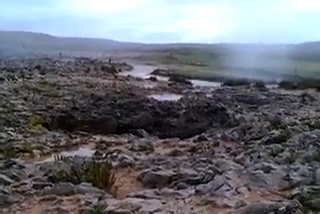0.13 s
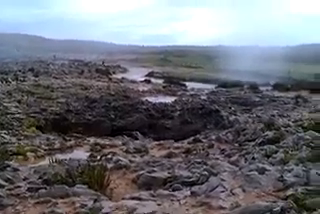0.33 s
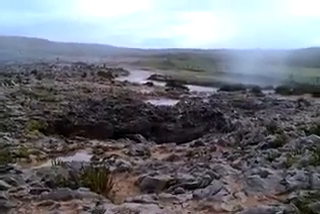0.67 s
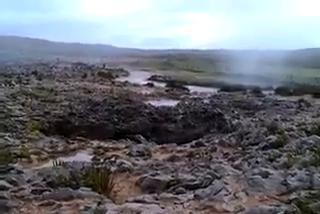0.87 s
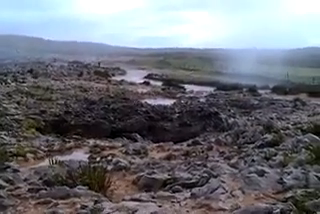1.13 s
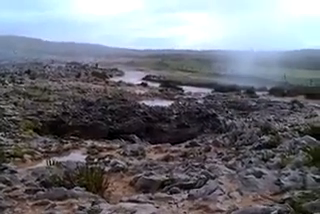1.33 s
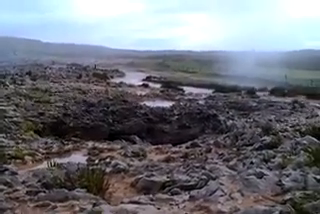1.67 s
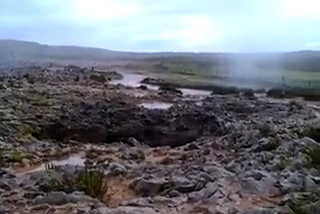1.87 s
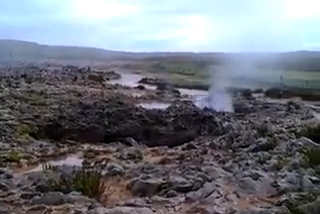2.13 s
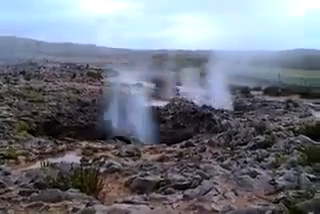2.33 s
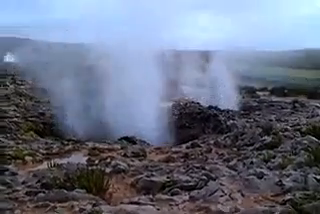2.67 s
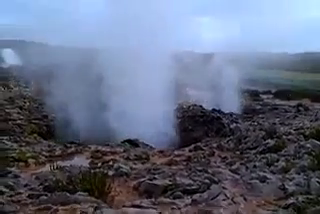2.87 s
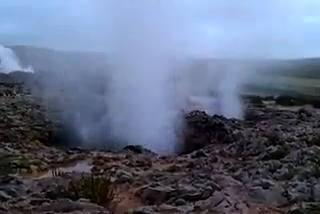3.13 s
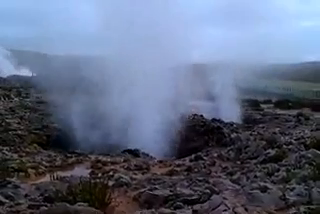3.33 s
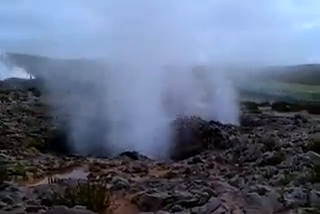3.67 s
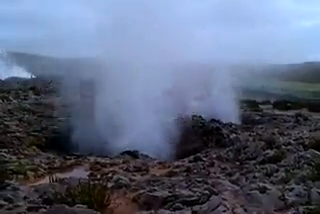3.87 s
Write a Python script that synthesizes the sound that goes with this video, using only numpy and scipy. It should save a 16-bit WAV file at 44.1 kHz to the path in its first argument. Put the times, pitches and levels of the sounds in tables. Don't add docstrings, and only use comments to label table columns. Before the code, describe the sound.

A blowhole erupts on a rocky coast: faint surf and fizzing spray, dull water slaps in a cave, then a deep roar and broad hissing jet that gradually eases. Outdoor single microphone, slightly coarse treble.

```python
import sys
import numpy as np
from scipy import signal
from scipy.fft import rfft, irfft
from scipy.io import wavfile
from scipy.ndimage import uniform_filter1d

SR = 44100
rng = np.random.default_rng(int(sys.argv[2]) if len(sys.argv) > 2 else 0)


def dump(signal):
    limited = np.clip(np.atleast_2d(signal).T, -1, 1)
    pcm = np.round(limited * 32767).astype(np.int16)
    wavfile.write(sys.argv[1], SR, pcm)


def level_to_linear(level):
    exponent = np.asarray(level, float) / 20
    return 10 ** exponent


N = 176400

# time_s, wash_db, fizz_db
SHORE_LEVELS = [(0, -44.5, -49), (.3, -43.5, -50.5), (.65, -43, -48.5), (.9, -43.5, -45), (1.1, -41, -46),
                (1.3, -41, -46.5), (1.5, -42.5, -49.5), (1.95, -41, -45), (2.2, -40, -45),
                (3.0, -40, -48.5), (3.6, -42.5, -48), (4, -46.5, -45)]
# time_s, peak_db, length_s
NEAR_SPLASHES = [
    (0.111, -46, .02),
    (.249, -38, 0.013),
]
# time_s, roar_db
CAVE_PRESSURE = [(0, -42.5), (.58, -41.5), (.75, -36.5), (.86, -43), (1.0, -37), (1.2, -38.5),
                 (1.38, -32.5), (1.5, -41), (1.85, -34.5), (2.05, -32), (2.19, -27.5), (2.27, -28.5),
                 (2.38, -22.5), (2.7, -20.5), (3.2, -23), (3.55, -26), (3.8, -27), (4.0, -29)]
# time_s, peak_db, width_ms
ROOF_SLAPS = [(0.726, -19.5, 1.7), (.795, -26.5, 1.5), (1.13, -28, 1.8), (1.318, -29, 0.76),
              (1.599, -28, 2.0), (1.999, -25.5, 1.8), (2.064, -24, 4.3), (2.13, -31, 2.5),
              (2.196, -18.5, 2.5), (2.376, -16, 1.15), (3.547, -19, 1.06)]
# time_s, hiss_db
BLOWHOLE_FLOW = [(0, -69), (1.9, -69), (2.2, -45), (2.36, -34.5), (2.52, -28.5), (2.65, -27.5),
                 (2.8, -27.5), (3.0, -28.5), (3.15, -29), (3.3, -31.5), (3.45, -29.5), (3.6, -34),
                 (3.7, -36), (3.83, -38.5), (3.92, -40), (4, -36.5)]
# time_s, level_db
RUSH_FLOW = [
    (2.3, -65),
    (2.45, -44),
    (2.6, -36),
    (2.75, -36.5),
    (2.88, -38),
    (3.0, -42),
    (3.3, -45),
    (4, -68),
]
# time_s, hiss_db
NARROW_FLOW = [
    (2.8, -70),
    (2.95, -49),
    (3.1, -45),
    (3.25, -45),
    (3.45, -40),
    (3.58, -42),
    (3.7, -51),
    (4, -50),
]

# frequency_hz, density_db
WASH_COLOUR = [(190, -17), (330, -5.5), (583, -7), (918, -5), (1260, -6), (1720, -5.5), (4410, -14),
               (5000, -16.5), (6500, -48), (11000, -120)]
SPLASH_COLOUR = [(300, -3), (700, 1), (1400, -4), (2500, -3), (3100, -18)]
FIZZ_COLOUR = [(4600, -9.5), (5100, -4), (5700, 4), (6400, -0.5), (7200, -12.5), (8500, -16), (10500, -23),
               (15000, -73)]
# frequency_hz, density_db
ROAR_LOW_COLOUR = [(12, -42), (20, -11), (48, -5), (133, -2), (219, -11), (249, -9), (330, -17), (420, -26),
                   (550, -24), (920, -120)]
ROAR_HIGH_COLOUR = [(12, -52), (20, -8), (97, 1.5), (157, -2.5), (243, 0.5), (309, -5), (394, -19),
                    (420, -20.5), (550, -31), (920, -120)]
# frequency_hz, density_db
JET_COLOUR = [(300, 0.5), (560, -6.5), (800, -1.5), (1350, -7.5), (2100, -3), (4000, -5.5), (5200, -6.5),
              (7500, -14)]
JET_TOP_COLOUR = [(7000, -12), (8300, -11.5), (10500, -18), (12000, -17), (14000, -46), (16000, -55)]
RUSH_COLOUR = [(550, -6), (780, 3), (1000, -3.5), (1400, -5.5), (2400, -0.5), (3400, -6), (4200, -11)]
# frequency_hz, density_db
NARROW_COLOUR = [(4300, -21), (4800, -10.5), (5200, 1), (5600, -5.5), (6200, -23)]
# frequency_hz, threshold_db
MUTE_UNDER = [(7000, -112), (7800, -99), (8600, -94), (9200, -83.5), (10000, -85), (11500, -88.5),
              (13000, -86), (14000, -84.5), (15000, -86)]

SKIRT_DB = -23
DROPS_PER_S, DROP_SHARE = 3000, 0.34
STEADY_S, STEADINESS = 0.077, 0.54
BRIGHTENS_FROM_DB, BRIGHTENS_OVER_DB = -47.5, 19
JET_TOP_DB = -16
SHAFT_HZ, SHAFT_WIDTH_HZ, SHAFT_DB = 103, 17, -30.5
SHAFT_S, SHAFT_LENGTH_S = 3.77, 0.24
NOTCH_HZ, NOTCH_WIDTH_HZ, NOTCH_DB = 9000, 400, -12
FRAME, BAND_LINES, GRID = 1024, 32, 741
MUTE_FOLLOWS, MUTE_CHANCE_DB = 0.33, 3.5
COARSE_FROM_HZ, COARSE_TO_HZ, WEAK_LINE_DB = 6300, 8600, (-14, -2.5)
TREBLE_LOST_S = (3.80, 3.85)


def in_time(rows):
    time_s, *columns = np.transpose(rows)
    return [np.interp(np.arange(N) / SR, time_s, column) for column in columns]


def rms_one(x):
    return x / np.sqrt(np.mean(x ** 2) + 1e-20)


def noise():
    return rng.standard_normal(N)


def drift(rate_hz):
    r = np.exp(-80 * np.pi * rate_hz / SR)
    chance = rng.standard_normal(N // 40 + 2002)
    slow = signal.lfilter([1], [1, -2 * r, r * r], chance)[2000:]
    return rms_one(slow - slow.mean())


def coloured(x, points, shared_db, patchy_db, rate_hz):
    hz = np.maximum(np.fft.rfftfreq(N, 1 / SR), 1)
    p = np.array(points, float)
    below = [p[0, 0] / 2, p[0, 1] + SKIRT_DB]
    above = [p[-1, 0] * 2, p[-1, 1] + SKIRT_DB]
    p = np.vstack([below, p, above])
    density_db = np.interp(np.log(hz), np.log(p[:, 0]), p[:, 1], left=-150, right=-150)
    spectrum = rfft(x) * level_to_linear(density_db)

    together = drift(rate_hz)
    half_octave = 2 * np.log2(hz)
    at = np.arange(N) / 40
    out = 0
    for k in range(int(2 * np.log2(p[0, 0])), int(2 * np.log2(p[-1, 0])) + 2):
        low, high = np.searchsorted(half_octave, [k - 1, k + 1])
        window = np.cos(np.pi / 2 * (half_octave[low:high] - k)) ** 2
        band = np.zeros_like(spectrum)
        band[low:high] = spectrum[low:high] * window
        gain = level_to_linear(shared_db * together + patchy_db * drift(rate_hz))
        out = out + irfft(band, N) * np.interp(at, np.arange(len(gain)), gain)
    return rms_one(out)


def spray():
    sizes = level_to_linear(3.54 * np.minimum(rng.exponential(1, N), 4))
    impacts = sizes * rng.choice([-1, 1], N)
    drops = rms_one(impacts * (rng.random(N) < DROPS_PER_S / SR))
    return np.sqrt(DROP_SHARE) * drops + np.sqrt(1 - DROP_SHARE) * noise()


def steady(x):
    power = uniform_filter1d(x ** 2, size=int(STEADY_S * SR))
    power = uniform_filter1d(power, size=int(STEADY_S * SR / 2))
    return rms_one(x / (power + 1e-9) ** (STEADINESS / 2))


def near_splashes():
    t = np.arange(N) / SR
    puffs = 0
    for start_s, peak_db, length_s in NEAR_SPLASHES:
        puffs = puffs + level_to_linear(peak_db) * np.exp(-2 * ((t - start_s) / length_s) ** 2)
    return puffs * coloured(spray(), SPLASH_COLOUR, 0, 0, 5)


def shore():
    wash_db, fizz_db = in_time(SHORE_LEVELS)
    wash = level_to_linear(wash_db) * coloured(spray(), WASH_COLOUR, 0.29, 0.67, 3.3)
    fizz = level_to_linear(fizz_db) * coloured(noise(), FIZZ_COLOUR, 0.23, 0.54, 3.2)
    return wash + near_splashes() + fizz


def roof_slaps():
    out = np.zeros(N)
    near = np.arange(-800, 800)
    for start_s, peak_db, width_ms in ROOF_SLAPS:
        u = near / SR / (width_ms / 1000)
        out[int(start_s * SR) + near] += level_to_linear(peak_db) * (u ** 2 - 1) * np.exp(-u ** 2 / 2)
    return out


def cave():
    roar_db, = in_time(CAVE_PRESSURE)
    flow_db, = in_time(BLOWHOLE_FLOW)
    high = np.clip((flow_db - BRIGHTENS_FROM_DB) / BRIGHTENS_OVER_DB, 0, 1)
    low_roar = steady(coloured(noise(), ROAR_LOW_COLOUR, 0.97, 0.82, 18.0))
    high_roar = steady(coloured(noise(), ROAR_HIGH_COLOUR, 0.54, 0.4, 15.0))
    roar = np.sqrt(1 - high) * low_roar + np.sqrt(high) * high_roar
    return level_to_linear(roar_db) * roar + roof_slaps()


def blowhole_jet():
    flow_db, = in_time(BLOWHOLE_FLOW)
    body = coloured(spray(), JET_COLOUR, 0.68, 0.57, 12.5)
    top = coloured(noise(), JET_TOP_COLOUR, 1.0, 0.6, 12.0)
    return level_to_linear(flow_db) * (body + level_to_linear(JET_TOP_DB) * top)


def first_rush():
    level_db, = in_time(RUSH_FLOW)
    return level_to_linear(level_db) * coloured(spray(), RUSH_COLOUR, 0.91, 0.52, 9.0)


def narrow_hole():
    hiss_db, = in_time(NARROW_FLOW)
    return level_to_linear(hiss_db) * coloured(noise(), NARROW_COLOUR, 1.2, 0.4, 8.2)


def shaft():
    r = np.exp(-np.pi * SHAFT_WIDTH_HZ / SR)
    w = 2 * np.pi * SHAFT_HZ / SR
    boom = signal.lfilter([1, 0, -1], [1, -2 * r * np.cos(w), r * r], noise())
    swell = np.exp(-((np.arange(N) / SR - SHAFT_S) / SHAFT_LENGTH_S) ** 2)
    return level_to_linear(SHAFT_DB) * steady(boom) * swell


def scene():
    return (shore() + cave() + blowhole_jet() + first_rush() + narrow_hole() + shaft())[None]


def housing_notch(x):
    hz = np.fft.rfftfreq(N, 1 / SR)
    notch = level_to_linear(NOTCH_DB * np.exp(-((hz - NOTCH_HZ) / NOTCH_WIDTH_HZ) ** 2))
    return irfft(rfft(x) * notch, N)


def starve_treble(x):
    lead = FRAME - GRID
    hz, s, z = signal.stft(np.pad(x, (lead, 0)), SR, "cosine", 2 * FRAME, FRAME)
    s = s - lead / SR
    power = np.abs(z) ** 2
    line_db = 10 * np.log10(power + 1e-20)
    loud_db = 10 * np.log10(np.sum(power, axis=0) + 1e-12) + 30
    band = np.arange(len(hz)) // BAND_LINES
    band_power = np.add.reduceat(power, np.arange(0, len(hz), BAND_LINES)) / BAND_LINES
    band_db = 10 * np.log10(band_power + 1e-20)

    p = np.array(MUTE_UNDER)
    limit = np.interp(hz, p[:, 0], p[:, 1], left=-200)[:, None] + MUTE_FOLLOWS * loud_db
    chance = MUTE_CHANCE_DB * rng.standard_normal(band_db.shape)[band]
    weak = np.interp(hz, [COARSE_FROM_HZ, COARSE_TO_HZ], WEAK_LINE_DB, left=-99)[:, None]
    strong_band = band_db[band] > limit[band * BAND_LINES] + chance
    strong_line = line_db > band_db[band] + weak + chance
    lost = (hz[:, None] > NOTCH_HZ) & (s > TREBLE_LOST_S[0]) & (s < TREBLE_LOST_S[1])
    keep = strong_band & strong_line & ~lost
    return signal.istft(z * keep, SR, "cosine", 2 * FRAME, FRAME)[1][lead:][:N]


def low_pass(x):
    return signal.sosfilt(signal.butter(12, 15050, fs=SR, output="sos"), x)


def record(dry):
    mix = starve_treble(housing_notch(dry[0]))[None]
    return low_pass(mix)


dry = scene()
out = record(dry)
dump(out)
```